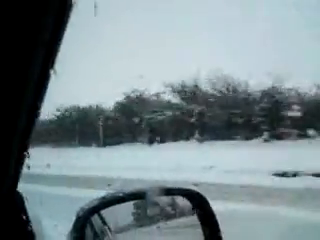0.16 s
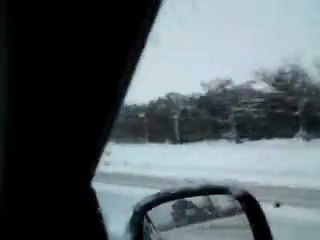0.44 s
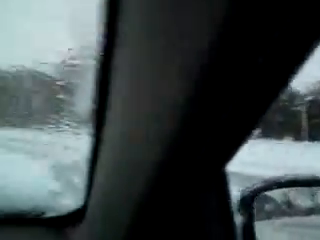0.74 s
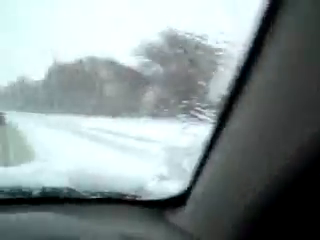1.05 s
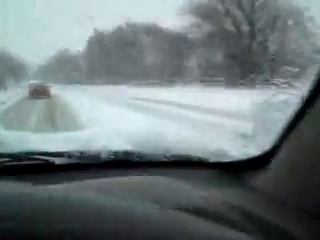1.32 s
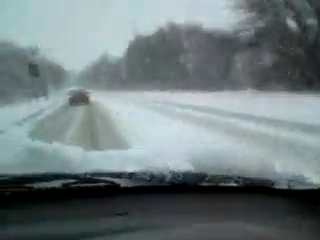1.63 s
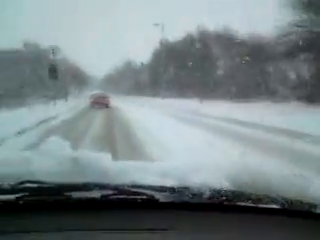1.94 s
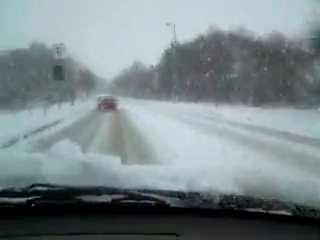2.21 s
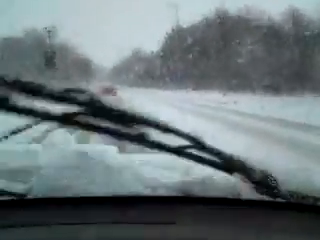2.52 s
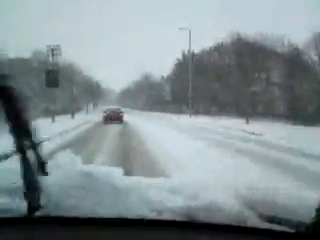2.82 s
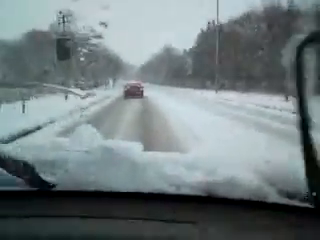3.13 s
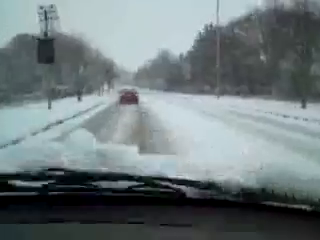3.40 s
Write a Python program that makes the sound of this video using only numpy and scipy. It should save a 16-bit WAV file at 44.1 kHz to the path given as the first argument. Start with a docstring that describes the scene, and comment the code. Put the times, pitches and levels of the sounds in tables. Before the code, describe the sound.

Low car cabin rumble throbs unevenly over snow ridges; a narrow tyre roar fades early as a faint drivetrain whine emerges, wet slush sprays in surges, then wipers knock, swish and flick, heard close from inside.

```python
"""A car cabin booms over bumps on a snowy road: drifting low tones throb over a noise bed of tyre rumble.
A faint drivetrain whine grows out of thin hums, beside a narrow tyre roar and a brief rush of window air.
Slush sprays the body in uneven surges of noise and random drops, mostly on the right, with cracks of grit.
The wipers make one sweep: noise for the swish and the flicks on the glass, dying tones for soft knocks."""
import sys
import numpy as np
from scipy import signal
from scipy.fft import rfft, irfft, next_fast_len
from scipy.io import wavfile
from scipy.ndimage import map_coordinates

SR = 44100
rng = np.random.default_rng(int(sys.argv[2]) if len(sys.argv) > 2 else 0)


def transcribe(signal):
    """Save signal, clipped to [-1, 1], as a 16-bit WAV file at the path in sys.argv[1]."""
    frames = np.atleast_2d(signal).T
    limited = np.clip(frames, -1, 1)
    pcm = np.round(limited * 32767).astype(np.int16)
    wavfile.write(sys.argv[1], SR, pcm)


N = 156996  # length in samples

TOP_HZ = 14000  # upper limit of the microphones' band
WHINE_WANDER = 0.0108  # relative unsteadiness of pitch, shared by the whine and the hums


def amp(db):
    """Decibels to gain."""
    return 10 ** (np.asarray(db) / 20)


def unit(x):
    """Scale to rms 1."""
    return x / np.sqrt(np.mean(x ** 2) + 1e-20)


def along(points, hz):
    """Read (Hz, value) points on a logarithmic frequency axis."""
    f, v = np.transpose(points)
    return np.interp(np.log(hz + 1), np.log(f + 1), v)


def curves(rows):
    """A list with one curve over time for each column after the seconds."""
    s, *cols = np.transpose(rows)
    return [np.interp(np.arange(N) / SR, s, c) for c in cols]


def wobble(rate):
    """A smooth random curve through `rate` random knots a second."""
    knots = rng.standard_normal(int(N * rate / SR) + 4)
    return map_coordinates(knots, [np.arange(N) * rate / SR])


def filtered(x, response):
    """Multiply the spectrum of x by a response of frequency."""
    m = next_fast_len(N + SR // 2)  # padded, so that the end does not wrap round
    return irfft(rfft(x, m) * response(np.fft.rfftfreq(m, 1 / SR)), m)[..., :N]


def coloured(x, spectrum):
    """Shape x with (Hz, dB) points, then scale to rms 1."""
    return unit(filtered(x, lambda hz: amp(along(spectrum, hz))))


def pan(db):
    """Left and right gains; a positive difference is louder on the left."""
    return amp(np.array([[db], [-db]]) / 2)


def tone(hz):
    """A sine of rms 1 that follows a pitch curve from a random phase."""
    return np.sqrt(2) * np.sin(2 * np.pi * (np.cumsum(hz) / SR + rng.random()))


def steady_tone(hz):
    """A sine of rms 1 at a fixed pitch."""
    return tone(np.full(N, hz))


def decay(start, t60):
    """An envelope that jumps to 1 at start and falls by 60 dB in t60 seconds."""
    t = np.arange(N) / SR - start
    return (t >= 0) * np.exp(-np.log(1000) * np.abs(t) / t60)


def window():
    """Air rushes past the side glass as broad noise, until the microphones turn away within a second."""
    # Each row: time in seconds, level in dB.
    window_level = [(0, -51), (.35, -44), (.6, -55), (1, -73)]
    # Each row: frequency in Hz, relative level in dB.
    window_colour = [(100, -10), (280, 7), (450, -5), (690, -6), (1000, -7), (1400, -8), (2200, -20),
                     (6000, -33)]
    side_db = -16  # towards the right
    level_db, = curves(window_level)
    air = coloured(rng.standard_normal((2, N)), window_colour)
    return amp(level_db) * pan(side_db) * air


def hums():
    """Thin unsteady tones fade away as the whine grows."""
    # Each row: pitch in Hz, level in dB before the fade and the wobble.
    hum_tones = [(180, -34.5), (296, -48.5), (379, -45.5)]
    fade_start_s, fade_end_s = 0.86, 1.6
    fade, = curves([(fade_start_s, 1), (fade_end_s, 0)])
    out = np.zeros(N)
    for hz, db in hum_tones:
        gain = fade * amp(db + 3.26 * wobble(9.46))
        out += gain * tone(hz * (1 + WHINE_WANDER * wobble(25.66)))
    return out


def whine():
    """Two multiples of one drivetrain pitch wander together, each with its own rough flutter."""
    # Each row: time in seconds, level in dB that the partials are set against.
    whine_level = [(0, -50.5), (1.25, -50), (1.42, -42.5), (1.7, -42.5), (2.05, -41), (2.24, -38),
                   (2.30, -42), (2.37, -40.5), (2.47, -40), (2.9, -44), (3.26, -41), (3.43, -39.5),
                   (3.56, -45)]
    # Each row: multiple of the base pitch, relative level in dB.
    partials = [(2, -0.5), (3, -1)]
    base_hz, flutter_depth = 146.8, 0.66
    level_db, = curves(whine_level)
    speed = 1 + WHINE_WANDER * wobble(60)
    out = np.zeros(N)
    for multiple, db in partials:
        flutter = 1 + flutter_depth * wobble(30)
        out += amp(level_db + db) * unit(flutter * tone(multiple * base_hz * speed))
    return out


def roar():
    """The tread roars in swells, a narrow band of noise with a faint singing tone in it."""
    # Each row: time in seconds, level in dB of the noise.
    roar_level = [(0, -42.5), (.27, -41.5), (.36, -40), (.43, -49), (.54, -44), (.7, -52), (.9, -54),
                  (.98, -44), (1.07, -50.5), (1.14, -43), (1.19, -49), (1.26, -41), (1.33, -46), (1.4, -44),
                  (1.52, -56), (2.7, -59), (3.3, -50), (3.56, -48)]
    # Each row: frequency in Hz, relative level in dB.
    roar_colour = [(350, -28), (530, -15), (600, -4.5), (645, -0.5), (680, -8), (720, -1), (790, -10.5),
                   (870, -15), (945, -5.5), (1100, -15), (1800, -47)]
    sing_hz, sing_db = 720, -7  # level against the noise
    level_db, = curves(roar_level)
    noise = coloured(rng.standard_normal(N), roar_colour)
    pitch_hz = sing_hz * (1 + 0.0041 * wobble(24.4))
    sing = amp(sing_db + 0.92 * wobble(11)) * tone(pitch_hz)
    return amp(level_db) * (noise + sing)


def swish():
    """Rubber sweeps slush off the windscreen with short swells of noise."""
    # Each row: time in seconds, level in dB.
    swish_level = [(2.8, -65), (2.87, -51), (2.925, -33), (2.96, -50), (3.01, -59), (3.045, -33),
                   (3.06, -55), (3.2, -75)]
    # Each row: frequency in Hz, relative level in dB.
    swish_colour = [(800, -22), (2300, -4), (2900, 0), (3700, -6), (4400, 1), (5100, -11), (6000, -18),
                    (14000, -35)]
    level_db, = curves(swish_level)
    rub = coloured(rng.standard_normal((2, N)), swish_colour)
    return amp(level_db) * pan(-3) * rub


def flicks():
    """The wiper blade flicks over wet glass: a fast-dying rub with a brief ring."""
    # Each row: start in seconds, starting level of the rub in dB, of the blade's ring in dB.
    flick_hits = [(3.253, -26, -31), (3.388, -30, -39), (3.44, -28, -40), (3.463, -27.5, -45)]
    # Each row: frequency in Hz, relative level in dB.
    flick_colour = [(600, -20), (1700, -12), (2350, 2), (2700, 4), (3150, -1), (4100, 1), (5000, 5),
                    (7000, -11), (14000, -14)]
    t60_s, side_db, ring_hz = 0.028, -9.5, 2689
    rub = coloured(rng.standard_normal((2, N)), flick_colour)
    out = np.zeros((2, N))
    for s, rub_db, ring_db in flick_hits:
        sound = amp(rub_db) * rub + amp(ring_db) * steady_tone(ring_hz)
        out += pan(side_db) * decay(s, t60_s) * sound
    return out


def knocks():
    """The wiper linkage knocks softly and rings in several short resonances."""
    # Each row: start in seconds, level in dB that the resonances are set against, left-right difference in dB.
    knock_hits = [(2.475, -31.5, 10), (2.543, -36, 6), (3.238, -31.5, -16), (3.321, -31.5, -11)]
    # Each row: resonance in Hz, relative level in dB, time to fall 60 dB in seconds.
    linkage_modes = [(576, -9, .04), (870, -6, 0.035), (1060, -7.5, 0.048), (1198, -6.5, 0.053),
                     (1330, -4, 0.027), (1920, -9, 0.025)]
    attack_s = 0.0014  # time constant of the soft onset
    out = np.zeros((2, N))
    for s, db, side_db in knock_hits:
        ring = np.zeros(N)
        for hz, mode_db, t60 in linkage_modes:
            ring += amp(mode_db) * decay(s, t60) * steady_tone(hz)
        onset = 1 - decay(s, attack_s * np.log(1000))
        out += amp(db) * pan(side_db) * ring * onset
    return out


def grit():
    """Hard grains tick on the body: a sharp crack and a short rattle of noise, some brighter than others."""
    # Each row: start in seconds, relative level in dB, left-right difference in dB, brightness in dB per octave.
    grains = [(.885, -16, -5, 10), (1.187, -24, -3, -2), (1.351, -14, -12, -1), (1.499, -21, -5, -6),
              (1.507, -20, -6, -10), (1.576, -17, -12, 0), (1.641, -21, -5, 2), (1.760, -24, -6, 0),
              (1.911, -17, -13, 4), (1.925, -20, -11, -1), (1.960, -22, -7, -3), (1.976, -14, -8, -7),
              (1.988, -16, -8, 5), (2.063, -25, -10, -5), (2.141, -17, -8, 2), (2.165, -27, -5, 3),
              (2.38, -21, -8, 0), (2.411, -14, -7, -4), (2.478, -16, -6, 5), (2.596, -20, -6, 2),
              (2.639, -23, -11, -11), (2.711, -24, -7, 2), (2.817, -29, -5, 7), (3.040, -18, -6, -1),
              (3.071, -21, -4, 3)]
    # Each row: frequency in Hz, relative level in dB before the brightness tilt.
    grit_colour = [(500, -43), (2500, -4), (5500, 6.5), (9000, -3), (14000, -5.5)]
    grit_db, rattle_t60_s = -7, 0.0039
    crack_db, crack_t60_s = 6, .0006  # the first contact is the sharpest
    size = 2048  # samples a grain, with the contact in the middle
    t = np.arange(size) / SR - size / SR / 2
    hz = np.fft.rfftfreq(size, 1 / SR)

    def fall(t60):
        return np.exp(-np.log(1000) * np.abs(t) / t60)

    envelope = (t >= 0) * (fall(rattle_t60_s) + amp(crack_db) * fall(crack_t60_s))
    out = np.zeros((2, N + SR))
    for s, db, side_db, bright_db in grains:
        tilt_db = bright_db * np.log2(np.clip(hz, 1, TOP_HZ))
        colour = unit(amp(along(grit_colour, hz) + tilt_db))
        burst = envelope * rng.choice([-1, 1], (2, size))
        start = round((s + t[0]) * SR)
        out[:, start:start + size] += amp(db + grit_db) * pan(side_db) * irfft(rfft(burst) * colour)
    return out[:, :N]


def splats():
    """Small lumps of slush: a random curve of sudden rises that each die away, centred, rms 1."""
    per_s, t60_s = 190, 0.028
    hits = (rng.random(N) < per_s / SR) * rng.uniform(.4, 1, N)
    heap = signal.fftconvolve(hits, decay(0, t60_s))[:N]
    return unit(heap - heap.mean())


def mist_and_drops():
    """Steady noise for the mist and random clicks of uneven size for the drops."""
    drops_per_s, spread_db = 1500, 3.5
    drop_share = 0.34  # of the power
    sizes = amp(spread_db * np.minimum(rng.exponential(size=N), 4))
    drops = unit((rng.random(N) < drops_per_s / SR) * sizes * rng.choice([-1, 1], N))
    mist = rng.standard_normal(N)
    return np.sqrt(drop_share) * drops + np.sqrt(1 - drop_share) * mist


def below(x, edge_hz):
    """The part of x below a steep edge."""
    return filtered(x, lambda hz: 1 / (1 + (hz / edge_hz) ** 20))


def slush():
    """Fine mist and countless drops hit the body in fluttering surges, with a treble that flickers by itself."""
    # Each row: time in seconds, level in dB before flutter and the offset of each side.
    spray_level = [(0.03, -36.5), (0.17, -41), (0.25, -34.5), (0.34, -43), (0.38, -37.5), (0.41, -43.5),
                   (0.59, -40), (0.61, -36.5), (0.65, -38.5), (0.67, -37.5), (0.71, -39), (0.745, -33.5),
                   (0.77, -38.5), (0.82, -39), (0.86, -36.5), (0.90, -44), (0.928, -45), (0.96, -37),
                   (0.97, -39), (1.35, -34), (1.44, -35.5), (1.49, -37.5), (1.51, -33), (1.52, -35),
                   (1.6, -32.5), (1.67, -35.5), (1.73, -41.5), (1.76, -35.5), (1.78, -39), (1.82, -35.5),
                   (1.89, -39.5), (1.91, -36), (1.99, -32.5), (2.0, -42), (2.03, -42), (2.06, -36),
                   (2.25, -35.5), (2.3, -42), (2.36, -35.5), (2.39, -32.5), (2.42, -33.5), (2.46, -40.5),
                   (2.48, -36.5), (2.62, -40.5), (2.64, -38), (2.7, -41.5), (2.74, -34.5), (2.75, -45),
                   (2.76, -44.5), (2.85, -33.5), (2.93, -38.5), (3.0, -36.5), (3.04, -35), (3.06, -41.5),
                   (3.09, -38), (3.19, -42.5), (3.22, -35), (3.24, -44.5), (3.27, -37.5), (3.29, -42),
                   (3.48, -35.5), (3.51, -36.5), (3.53, -42), (3.55, -31.5)]
    # Each row: time in seconds, treble level in dB on the left, on the right, before its flicker.
    treble_level = [(0, 0, -4), (.6, 0, -3.5), (1.2, 1.5, -3.5), (1.6, 2, -1.5), (2.4, 2, -0.5),
                    (2.73, -1, -1.5), (2.9, 6, -7), (3.2, 2.5, -9.5), (3.5, 3, -8)]
    # Each row: time in seconds, level in dB of the finest fizz against the spray.
    fizz_level = [(0, -3), (.5, -3.5), (.8, -3), (1.6, -0.5), (2.6, -1), (2.9, -1), (3.2, -2), (3.5, -1.5)]
    # Spray colour on either side. Each row: frequency in Hz, relative level in dB.
    left_colour = [(300, -36), (1000, -3.5), (1600, -0.5), (2250, -3), (3100, -8.5), (4300, 0.5),
                   (5500, -10), (6200, -14), (7300, -4), (8600, -13), (11800, -3.5), (14000, -11.5)]
    right_colour = [(300, -2.5), (1000, -7.5), (1600, -5.5), (2200, -6), (2900, 1.5), (3700, -0.5),
                    (5200, -0.5), (6500, 1.5), (8700, -4.5), (10000, -7), (11200, -9.5), (14000, -14)]
    left_db, right_db = -1.5, 5.5
    treble_hz, fizz_hz = 5530, 9400  # lower edges of the two upper bands
    splat_db, spatter_db, flicker_db = 1.39, 1.4, 0.8  # depths of flutter
    level_db, = curves(spray_level)
    fizz_db, = curves(fizz_level)
    left_treble_db, right_treble_db = curves(treble_level)
    surge_db = level_db + splat_db * splats() + spatter_db * wobble(301.6)
    sides = []
    for colour, side_db, treble_db in ((left_colour, left_db, left_treble_db),
                                       (right_colour, right_db, right_treble_db)):
        spray = coloured(mist_and_drops(), colour)
        body = below(spray, treble_hz)
        fizz = spray - below(spray, fizz_hz)
        treble = spray - body - fizz
        treble_gain = amp(treble_db + flicker_db * wobble(60))
        mixed = body + treble_gain * treble + amp(fizz_db) * fizz
        sides.append(amp(surge_db + side_db) * mixed)
    return np.array(sides)


def throb():
    """A cabin resonance throbs unevenly as the tyres ride over ridges of snow."""
    # Each row: time in seconds, level in dB before the offset below.
    throb_level = [(0.0, -46), (0.05, -39), (0.18, -39), (0.21, -51), (0.32, -20.5), (0.39, -24),
                   (0.45, -33), (0.56, -25.5), (0.82, -31), (0.87, -21.5), (1.05, -28.5), (1.1, -24),
                   (1.15, -32), (1.65, -24.5), (1.66, -30), (1.73, -20.5), (1.91, -29), (1.94, -16.5),
                   (2.05, -33), (2.09, -21), (2.14, -33), (2.25, -21), (2.28, -37), (2.39, -19.5),
                   (2.42, -34), (2.54, -27.5), (2.62, -34), (2.65, -24.5), (2.76, -35), (2.78, -24),
                   (3.06, -22.5), (3.08, -27), (3.31, -20), (3.34, -32), (3.53, -29), (3.56, -31)]
    throb_hz, drift_hz, throb_db = 127.2, 7.9, -2.5
    level_db, = curves(throb_level)
    return amp(level_db + throb_db) * tone(throb_hz + drift_hz * wobble(35))


def road():
    """Tyre rumble as noise through the cabin's resonances, nearly mono in the bass and wide in the treble."""
    # Each row: frequency in Hz, relative level in dB per Hz.
    road_colour = [(10, -14), (18, -1), (26, -3.5), (33, -2.5), (42, -8), (52, -12.5), (64, -9), (78, -7.5),
                   (100, -12.5), (128, -14), (156, -14), (176, -12), (210, -23), (270, -27), (310, -24),
                   (350, -31), (440, -27.5), (480, -30.5), (525, -28.5), (680, -35), (1000, -42.5),
                   (2000, -47), (5000, -53.5), (14000, -69)]
    # Each row: frequency in Hz, likeness of left and right (1 is identical).
    road_alike = [(50, 0.97), (130, 1), (300, 0.94), (650, 0.84), (1300, 0.54), (4000, 0.042)]
    # Each row: time in seconds, level in dB before the offset below.
    road_level = [(0, -22), (.3, -23), (.6, -24), (1.2, -24.5), (2.2, -22.5), (3.25, -22), (3.56, -24)]
    road_db = 3.5

    def mid_side_response(hz):
        angle = np.arccos(np.clip(along(road_alike, hz), -1, 1)) / 2
        return amp(along(road_colour, hz)) * np.array([np.cos(angle), np.sin(angle)])

    level_db, = curves(road_level)
    mid, side = filtered(rng.standard_normal((2, N)), mid_side_response)
    return amp(level_db + road_db) * unit(np.array([mid + side, mid - side]))


def boom():
    """The cabin's lumpy low boom over road bumps: one deep tone with drifting pitch and strongly uneven level."""
    # Each row: time in seconds, level in dB before the offset below.
    boom_level = [(0.0, -29), (0.06, -33), (0.14, -21), (0.16, -17.5), (0.35, -33.5), (0.43, -16),
                  (0.47, -30), (0.5, -12), (0.56, -27), (0.6, -16), (0.64, -14), (0.71, -22), (0.75, -11.5),
                  (0.89, -29), (0.95, -12.5), (1.04, -25), (1.18, -19), (1.2, -24), (1.25, -13),
                  (1.38, -23), (1.42, -17), (1.46, -16), (1.5, -32), (1.57, -15), (1.63, -27),
                  (1.66, -13.5), (1.72, -12.5), (1.76, -26), (1.8, -13), (1.82, -15), (1.93, -28),
                  (1.96, -16), (2.11, -18.5), (2.14, -23.5), (2.18, -15.5), (2.22, -16), (2.24, -15),
                  (2.32, -24), (2.36, -18), (2.41, -24), (2.46, -14.5), (2.51, -16), (2.56, -27),
                  (2.62, -15), (2.69, -34), (2.75, -19), (2.81, -28), (2.85, -16), (2.95, -23),
                  (3.04, -13.5), (3.14, -25), (3.19, -13.5), (3.24, -31), (3.34, -10.5), (3.39, -23),
                  (3.43, -17), (3.45, -29), (3.49, -12), (3.53, -28), (3.56, -8)]
    # Each row: time in seconds, pitch in Hz before the drift.
    boom_pitch = [(0, 55.6), (.3, 56.6), (.55, 51.03), (.8, 51), (1.0, 55.93), (1.4, 57.2), (1.65, 44.9),
                  (2.1, 50), (2.32, 40.77), (2.5, 58), (2.75, 51.06), (2.97, 47.3), (3.2, 55), (3.4, 48.98),
                  (3.56, 55)]
    drift_hz, boom_db = 3.16, -.3
    level_db, = curves(boom_level)
    pitch_hz, = curves(boom_pitch)
    return amp(level_db + boom_db) * tone(pitch_hz + drift_hz * wobble(23.03))


def cabin():
    """Rumble and tones inside the car, which reach the right microphone slightly later than the left."""
    lag_s, side_db = .0001, -1
    inside = hums() + whine() + roar() + throb() + road() + boom()
    ears = np.array([[1], [-1]])  # half the lag as an advance on the left, half as a delay on the right
    lagged = filtered(inside, lambda hz: np.exp(1j * np.pi * hz * lag_s * ears))
    return pan(side_db) * lagged


def scene():
    """Everything as heard from a front seat."""
    wipers = swish() + flicks() + knocks()
    return window() + wipers + grit() + slush() + cabin()


def record(dry):
    """The microphones pass nothing from their band limit upwards."""
    return filtered(dry, lambda hz: hz < TOP_HZ)


dry = scene()
out = record(dry)
transcribe(out)
```